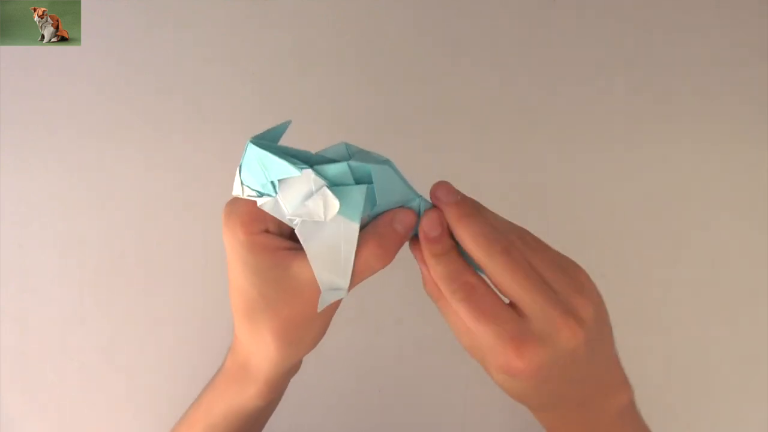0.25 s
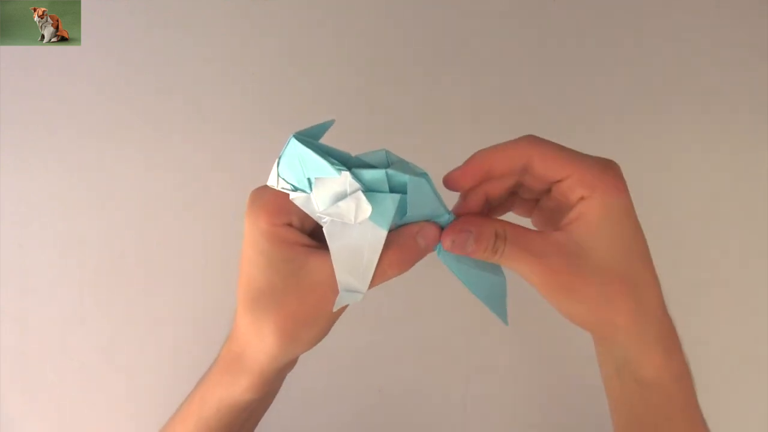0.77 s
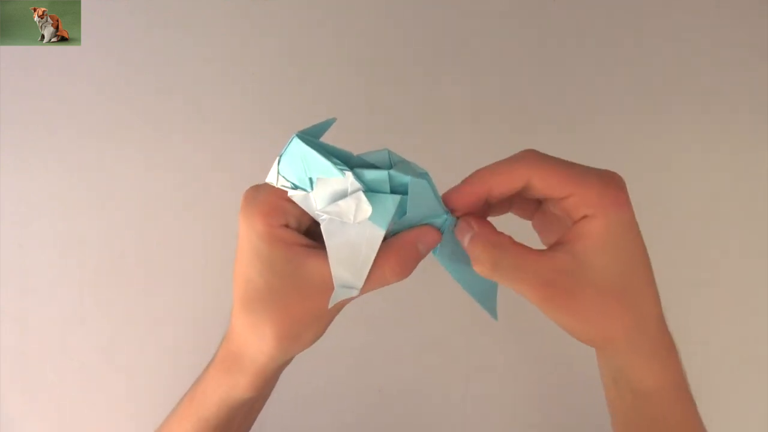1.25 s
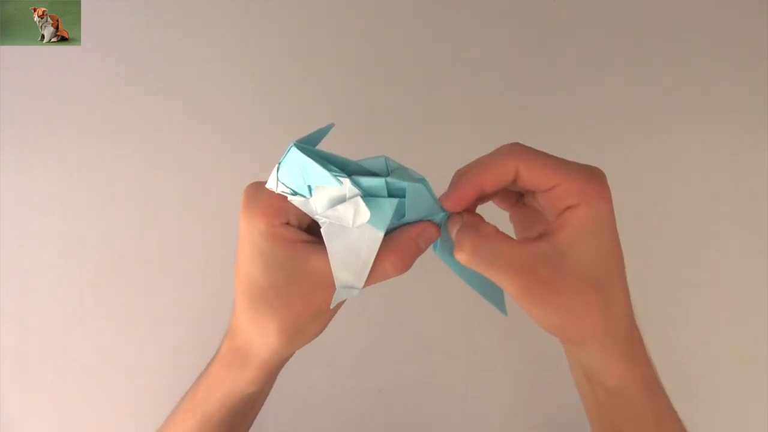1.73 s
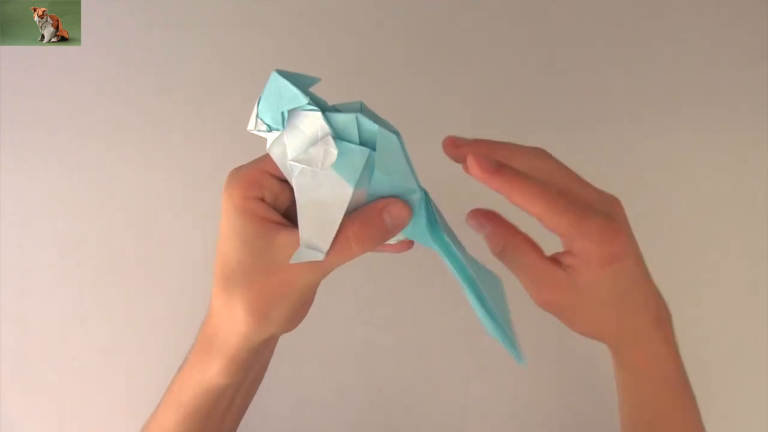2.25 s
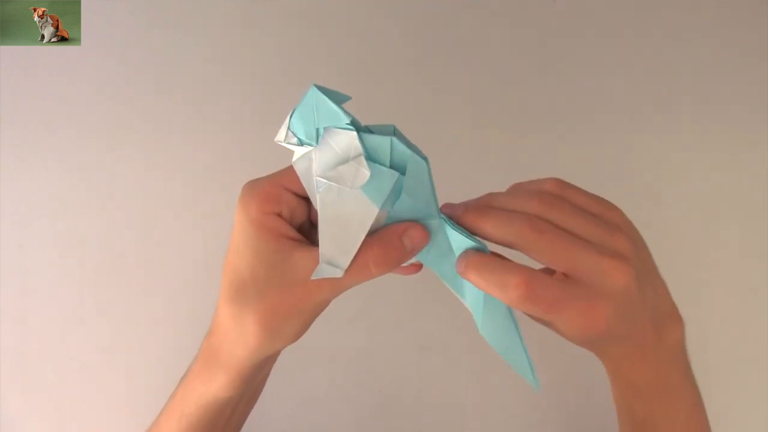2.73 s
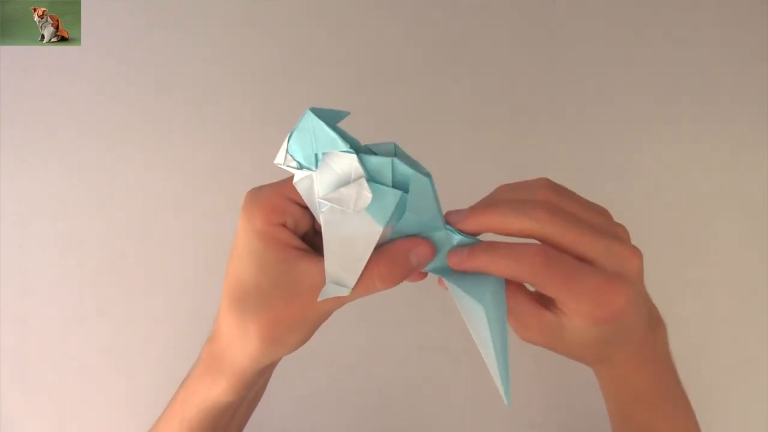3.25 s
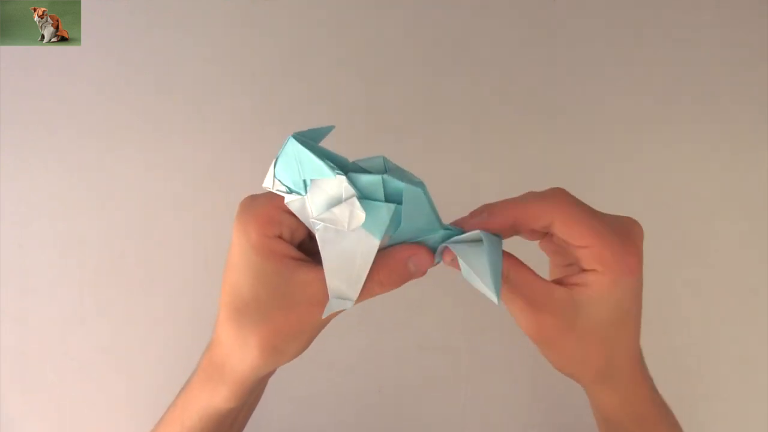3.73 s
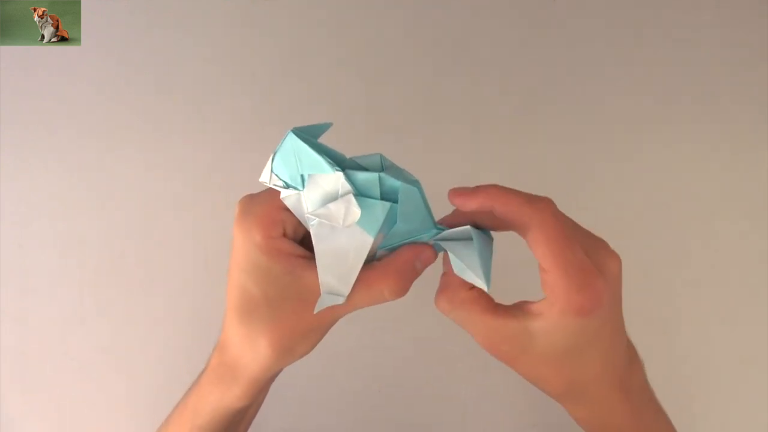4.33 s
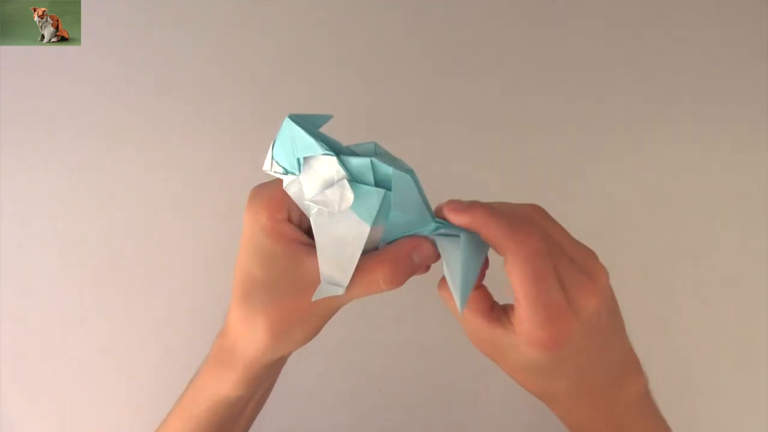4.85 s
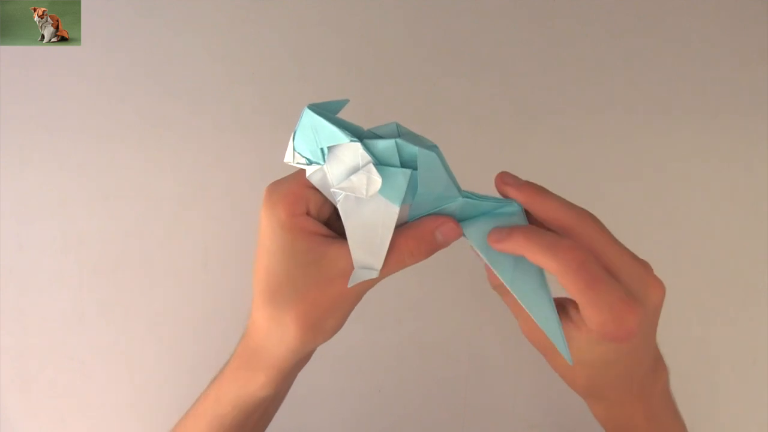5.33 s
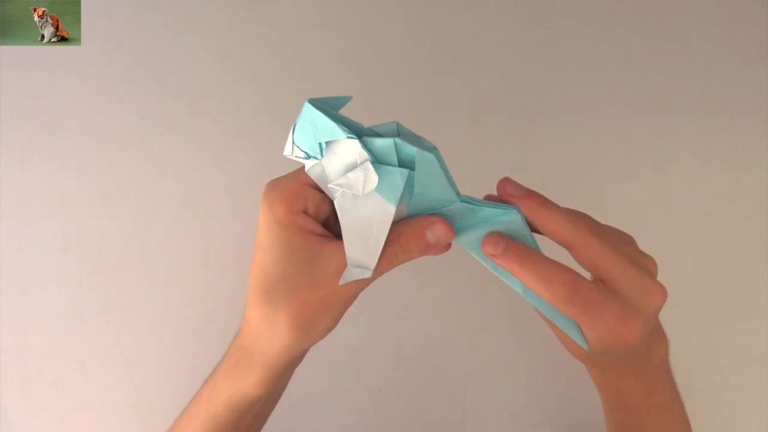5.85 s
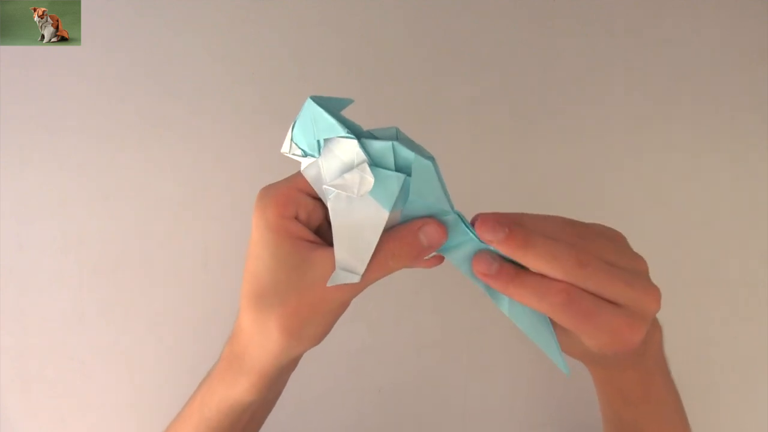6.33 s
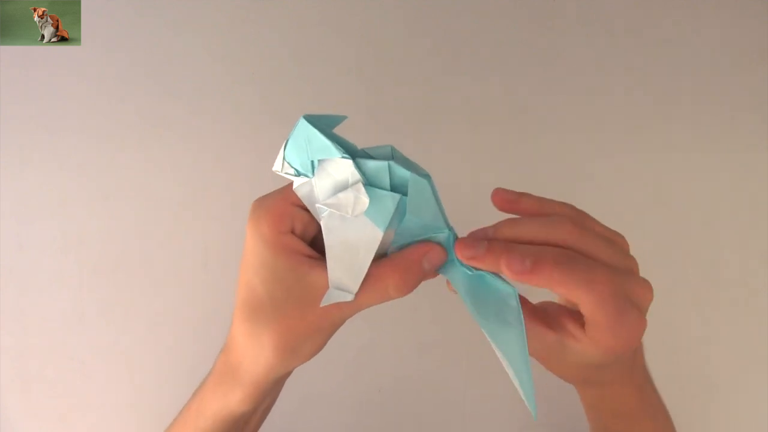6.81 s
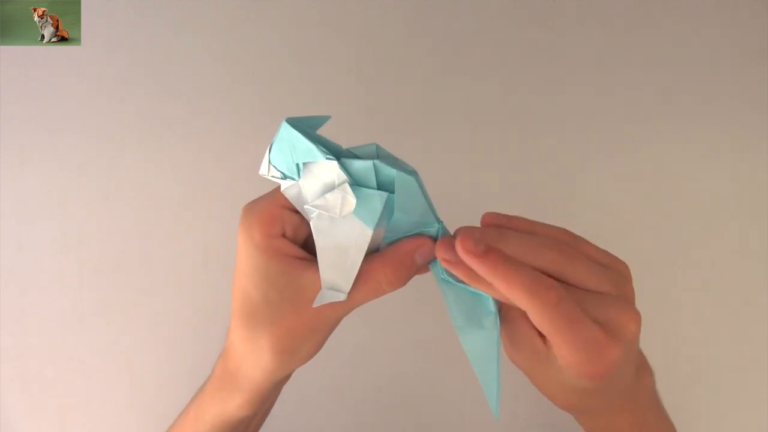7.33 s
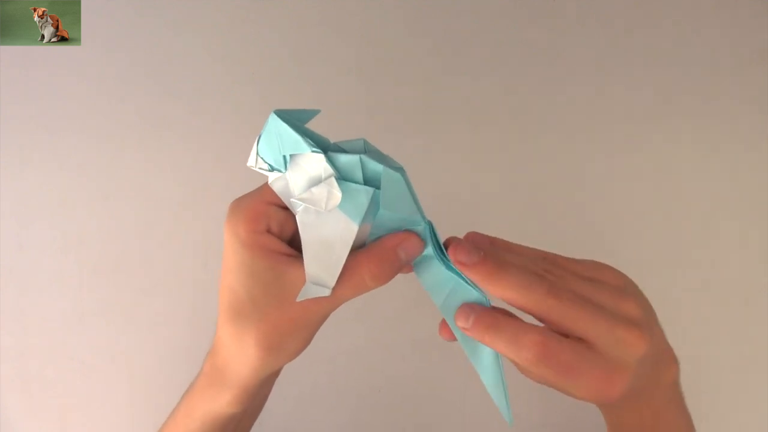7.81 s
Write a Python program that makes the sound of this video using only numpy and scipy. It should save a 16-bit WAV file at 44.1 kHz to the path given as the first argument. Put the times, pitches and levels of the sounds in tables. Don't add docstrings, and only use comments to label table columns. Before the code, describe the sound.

Close stereo sound of hands shaping a folded paper model in a quiet room. Crisp creases snap in irregular bursts, with a tight loud cluster just before one second, then scattered pops, faint ticks and papery rubs. A few snaps ring briefly. Each leaves a soft short room tail above quiet air noise and hiss.

```python
import sys
import numpy as np
from scipy import signal
from scipy.fft import rfft, irfft
from scipy.io import wavfile

SR = 44100
rng = np.random.default_rng(int(sys.argv[2]) if len(sys.argv) > 2 else 0)


def magnitude_from_level(level_db):
    exponent = np.asarray(level_db, float) / 20
    return 10 ** exponent


def unload_wav(signal):
    wavfile.write(
        sys.argv[1],
        SR,
        np.round(np.clip(np.atleast_2d(signal).T, -1, 1) * 32767).astype(np.int16),
    )


N = 355887

# frequency in Hz, left-right likeness from 0 to 1.
NEAR_LIKENESS = [(300, 1), (2000, 1), (5000, 0.46), (9000, 1), (14000, 0.44)]


def evened(x):
    return x / np.sqrt(np.mean(x ** 2) + 1e-20)


def read(points, hz):
    f, value = np.transpose(points)
    return np.interp(np.log(hz + 1), np.log(f + 1), value)


def coloured(x, db_of):
    length = x.shape[-1]
    gain = magnitude_from_level(db_of(np.fft.rfftfreq(length, 1 / SR)))
    return irfft(rfft(x) * gain, length)


def causal(x, db_of):
    log_gain = np.log(magnitude_from_level(db_of(abs(np.fft.fftfreq(2048, 1 / SR)))))
    taps = np.fft.ifft(np.exp(signal.hilbert(log_gain).conj())).real
    return signal.oaconvolve(x, taps[None], axes=1)[:, :x.shape[1]]


def paired(a, b, likeness):
    length = a.shape[-1]
    same = np.clip(read(likeness, np.fft.rfftfreq(length, 1 / SR)), 0, 1)
    right = same * rfft(a) + np.sqrt(1 - same ** 2) * rfft(b)
    return np.array([a, irfft(right, length)])


def add(mix, s, sound):
    part = mix[:, max(round(s * SR), 0):][:, :sound.shape[1]]
    part += sound[:, :part.shape[1]]


def buckles():
    # start in seconds, peak in dB, facet body in dB, sharp edge in dB, length in ms.
    crack_rows = [(.4, -31, -13.5, -17.5, 3.1), (.807, -15.5, -21, -21.5, 2.8), (.883, -19, -9.5, -12, 4.4),
                  (0.8889, -15, -39, -18, 7), (0.8942, -16.5, -22.5, -13.5, 5.7),
                  (0.9055, -11, -38, -14.5, 2.3), (1.637, -23.5, -14, -31.5, 4.6),
                  (1.9843, -12, -30.5, -18, 3.6), (2.104, -31.5, -31, -14, 8.7),
                  (2.182, -28.5, -26.5, -21, 3.8), (2.31, -29, -21.5, -15.5, 4.6),
                  (2.6401, -18.5, -22, -19, 4.8), (3.011, -14, -27, -16, 4.1),
                  (4.2188, -26.5, -19.5, -9.5, 5.6), (4.783, -28, -21, -22.5, 8),
                  (4.936, -24.5, -26.5, -18.5, 4.3), (5.2648, -23.5, -24, -21, 5.5),
                  (5.55, -27.5, -37, -21, 2.1), (5.9511, -20, -29, -21, 3.3),
                  (5.967, -16.5, -13, -22.5, 5.5), (6.329, -28.5, -12, -39, 1.8),
                  (7.4987, -18.5, -22, -23, 1.9), (7.787, -20, -17.5, -12, 2.1),
                  (7.8098, -15, -39, -8, 2.1)]
    # start in seconds, peak in dB, weight of the flap in dB, sharp edge in dB.
    fold_rows = [(.534, -39, -12, -20), (.574, -41, -4, -5), (0.69, -42, -23, -16), (.77, -36.5, -6.5, -20),
                 (1.159, -36, -9.5, -6), (1.926, -34, -10.5, -17), (2.628, -35.5, 2.5, -3),
                 (2.685, -30.5, -18, -23), (3.438, -38, -15, -11), (5.082, -39.5, 16, 8),
                 (5.559, -36, -17, -21), (5.568, -36, -31, -46), (5.932, -39, -8, -19),
                 (6.019, -26.5, -18, -27), (6.4, -34.5, -23, -47), (6.589, -39, -9, -17),
                 (6.6174, -29.5, -16.5, -13), (6.926, -34.5, -20, -31), (7.008, -36, -15, -18),
                 (7.519, -28, -16, -21), (7.539, -38.5, -6, -24), (7.623, -35, -16, -14),
                 (7.749, -50, 2, 0), (7.874, -31.5, -16, -18)]
    # start in seconds, peak in dB.
    tick_rows = [(0.19, -37), (.199, -35.5), (.339, -43.5), (1.188, -41.5), (2.091, -34), (2.912, -34.5),
                 (3.322, -34.5), (3.452, -36.5), (3.902, -39), (4.279, -36.5), (4.664, -46.5),
                 (4.711, -38.5), (5.18, -33), (5.573, -34), (5.678, -31), (5.849, -44), (5.858, -43.5),
                 (5.88, -42), (6.199, -32), (6.457, -31), (7.137, -34), (7.441, -43), (7.676, -35),
                 (8.035, -38.5)]
    cracks = [(s, db, -26.5, body, edge, ms) for s, db, body, edge, ms in crack_rows]
    folds = [(s, db, weight, weight - 0.5, edge, 5.3) for s, db, weight, edge in fold_rows]
    ticks = [(s, db, -31, -20, -15.5, 3.6) for s, db in tick_rows]
    return sorted(cracks + folds + ticks)


def snap(peak_db, thump_db, body_db, edge_db, ms, noise):
    snap_bands = [200, 600, 2300, 5800, 11000, 16000]
    t = np.arange(noise.shape[1]) / SR * 1000
    rattle = magnitude_from_level(-10 * t / ms) / (1 + (t / ms) ** 6)
    after = magnitude_from_level(-13.5 - 0.61 * t)
    tick = 5.5 * (t == 0)
    burst = paired(*(noise * (rattle + after)), NEAR_LIKENESS) + tick
    bare = burst[0] * np.exp(-t / .08)
    levels = [thump_db + 13, thump_db + 18.5, body_db + 19.0, 0, edge_db + 12.0, edge_db - 1.0]
    colour = [(14, thump_db - 46)] + list(zip(snap_bands, levels))
    sound = causal(np.vstack([burst, bare]), lambda hz: read(colour, hz))
    sound[2] *= np.linalg.norm(sound[0]) / np.linalg.norm(sound[2])
    return magnitude_from_level(peak_db - 1.28) * sound / abs(sound[0] + sound[1]).max() * 2


def creases():
    out, snaps = np.zeros((3, N)), buckles()
    noise = rng.standard_normal((len(snaps), 2, 1024))
    for (s, *shape), chance in zip(snaps, noise):
        add(out, s + .0006, snap(*shape, chance))
    return out


def ringing_paper():
    # start in seconds, peak in dB.
    flips = [(0.771, -39), (0.807, -44), (0.867, -42), (.886, -47), (1.963, -43.5), (1.984, -35),
             (2.093, -43), (2.313, -45), (2.618, -46.5), (2.639, -42), (5.931, -44), (7.788, -46),
             (7.81, -42)]
    # start in seconds, peak in dB, pitch in Hz.
    facets = [(0.809, -41, 1070), (1.637, -38, 2260), (1.981, -33, 5400), (1.982, -44, 970),
              (2.311, -43.5, 820), (2.627, -43, 930), (2.642, -22.5, 7700), (2.685, -39, 1960),
              (2.754, -37, 1770), (2.763, -43, 2400), (3.012, -55, 970), (3.012, -21, 7700),
              (3.414, -45, 860), (3.859, -47, 1910), (4.784, -41, 930), (4.784, -36, 1750),
              (5.083, -41.5, 1090), (5.116, -43, 8000), (5.267, -35, 2200), (5.566, -40.5, 1050),
              (5.559, -26, 6600), (5.567, -20.5, 6350), (5.575, -33, 6400), (5.967, -18.5, 2840),
              (5.968, -32, 2230), (6.327, -30.5, 1710), (6.618, -23, 7200), (7.499, -14.5, 8200),
              (7.809, -21.5, 3550), (7.809, -15.5, 4760)]
    flap_hz, flap_vary, flap_cycles = 410, 0.3, 14.4
    facet_cycles = 17.0
    out, t = np.zeros((3, N)), np.arange(4096) / SR
    blows = rng.standard_normal((len(flips) + len(facets), 96)) * magnitude_from_level(-.7 * np.arange(96))
    rings = []
    for (s, db), blow in zip(flips, blows):
        rings.append((s, db, flap_hz * (1 + flap_vary * np.tanh(blow[0])), flap_cycles))
    rings += [(*row, facet_cycles) for row in facets]
    for (s, db, hz, cycles), blow in zip(rings, blows):
        wave = np.sin(2 * np.pi * hz * t)
        ring = np.convolve(magnitude_from_level(-60 * t * hz / cycles) * wave * np.tanh(1.5 * hz * t), blow)
        first = np.zeros_like(ring)
        first[:len(t)] = np.exp(-hz * t / 2.2) * wave
        sent = 0.49 * first * np.linalg.norm(ring) / np.linalg.norm(first)
        add(out, s + 0.00044, magnitude_from_level(db) * np.array([ring, ring, sent]) / abs(ring).max())
    return out


def slips(per_s, spread_db):
    size = magnitude_from_level(spread_db * np.minimum(rng.exponential(1, N), 5))
    size = size * (rng.random(N) < per_s / SR)
    size = signal.lfilter([1], [1, -.9], size)
    return paired(*(size * rng.standard_normal((2, N))), NEAR_LIKENESS)


def fingers():
    # middle in seconds, length in seconds, level in dB.
    skims = [(.12, .11, -54.5), (.572, .028, -57.5), (1.186, .1, -57.5), (1.263, 0.038, -57),
             (2.752, .07, -54), (2.934, 0.061, -56.5), (3.318, 0.045, -50.5), (3.472, 0.059, -49),
             (3.906, 0.027, -51), (4.133, .03, -59.5), (4.195, 0.041, -57.5), (4.248, 0.074, -57),
             (4.653, .05, -66), (4.73, 0.036, -62), (4.852, 0.07, -56), (5.405, 0.036, -57),
             (5.546, 0.061, -49), (5.916, 0.04, -54.5), (6.218, 0.053, -55), (6.897, .074, -64),
             (7.648, 0.048, -49.5), (8.023, 0.2, -58.5)]
    # middle in seconds, length in seconds, level in dB, pitch in Hz.
    drags = [(.005, 0.017, -54.5, 1050), (0.198, 0.044, -51.5, 5500), (0.424, .053, -53, 7000),
             (1.432, .056, -53.5, 6500), (1.821, 0.039, -59.5, 3000), (1.956, 0.074, -45.5, 5500),
             (0.897, 0.045, -59, 700), (1.987, 0.075, -53, 800), (5.976, .05, -51, 800),
             (2.179, 0.033, -53, 6030), (3.201, .075, -54, 5670), (5.715, 0.019, -41, 5950),
             (2.099, 0.035, -47, 1480), (2.669, .05, -53, 2200), (2.734, 0.033, -50.5, 2000),
             (2.772, .04, -51.5, 2000), (3.851, .038, -59.5, 10000), (5.088, 0.048, -72, 1300),
             (5.171, 0.085, -58.5, 4530), (5.55, 0.072, -54.5, 1200), (6.003, 0.077, -61, 2800),
             (6.37, 0.035, -56, 10000), (6.48, .065, -59, 3500), (7.053, .026, -59, 4000),
             (7.286, .04, -64, 4930), (7.754, 0.028, -56, 5000), (7.878, 0.058, -49.5, 4000)]
    skim_hz, skim_octaves, drag_octaves = 7200, 0.84, 1.57
    out, skin = np.zeros((2, N)), slips(per_s=4500., spread_db=1.7)
    strokes = [(*row, skim_hz, skim_octaves) for row in skims]
    strokes += [(*row, drag_octaves) for row in drags]

    def hump_db(hz, pitch_hz, octaves):
        hump = -6.0 * (np.log2((hz + 1) / pitch_hz) / octaves) ** 2
        return np.maximum(hump - 2.7 * (hz / 12000) ** 3, -50)

    for s, length, db, pitch_hz, octaves in strokes:
        swell = np.hanning(round(1.6 * length * SR))
        grain = skin[:, round(s * SR * .9):][:, :len(swell)]
        rub = coloured(grain, lambda hz: hump_db(hz, pitch_hz, octaves))
        add(out, s - len(swell) / SR / 2, magnitude_from_level(db) * evened(rub) * swell)
    return out


def walls(x):
    # frequency in Hz, time to fall by 60 dB in seconds.
    decay = [(300, 0.37), (900, 0.5), (2100, 0.45), (5500, 0.54), (10000, 0.43), (15000, 0.44)]
    shape = (3, 2, SR // 2)
    taps = rng.standard_normal(shape) * (rng.random(shape) < .12)
    hz, t, z = signal.stft(taps, SR, nperseg=128)
    tails = signal.istft(z * magnitude_from_level(-60 * t / read(decay, hz)[:, None]), SR, nperseg=128)[1]
    ms = np.arange(tails.shape[-1]) / SR * 1000
    tails = tails * np.clip((ms - 3.0) / 12.5, 0, 1)
    turn = 2 * np.pi * (np.arange(N) / SR * 7.3 + np.arange(3)[:, None] / 3)
    share = np.sqrt((1 + np.cos(turn)) / 3)
    out = np.zeros((2, N))
    for weight, tail in zip(share, tails):
        out += signal.oaconvolve((x * weight)[None], tail / np.linalg.norm(tail[0]), axes=1)[:, :N]
    return out


def room_tone():
    # frequency in Hz, level in dB per Hz.
    tone_colour = [(25, -10), (50, -5.5), (100, 2), (160, 3), (260, 1.5), (500, -2), (800, -7), (1600, -11),
                   (3200, -15.5), (6300, -17.5), (10000, -21.5), (13000, -22.5), (16500, -25.5)]
    # frequency in Hz, left-right likeness from 0 to 1.
    tone_likeness = [(60, 0.14), (500, 0.18), (15000, 0.24)]
    noise = paired(*rng.standard_normal((2, N)), tone_likeness)
    tone = coloured(noise, lambda hz: read(tone_colour, hz))
    balance = magnitude_from_level(np.array([[.9], [-.9]]))
    return magnitude_from_level(-55.5) * evened(tone) * balance


def scene():
    # frequency in Hz, left over right in dB.
    lean = [(400, -1.5), (1300, 0.5), (2400, 3), (4400, 3), (8100, 8), (12000, -5)]
    left, right, bare = creases() + ringing_paper()
    rub = fingers()
    near_left = causal((left + rub[0])[None], lambda hz: read(lean, hz) / 2)
    near_right = causal((right + rub[1])[None], lambda hz: -read(lean, hz) / 2)
    near = np.vstack([near_left, near_right])
    return near + magnitude_from_level(-3.0) * walls(bare + rub[0]) + room_tone()


def top_cut(x):
    return signal.sosfilt(signal.butter(12, 16500, fs=SR, output="sos"), x)


def record(dry):
    # frequency in Hz, gain in dB.
    roll_off = [(12000, 0.), (14000, -1), (15500, -3), (16400, -6), (16600, -70)]
    mix = causal(dry, lambda hz: read(roll_off, hz))
    return top_cut(mix)


dry = scene()
out = record(dry)
unload_wav(out)
```